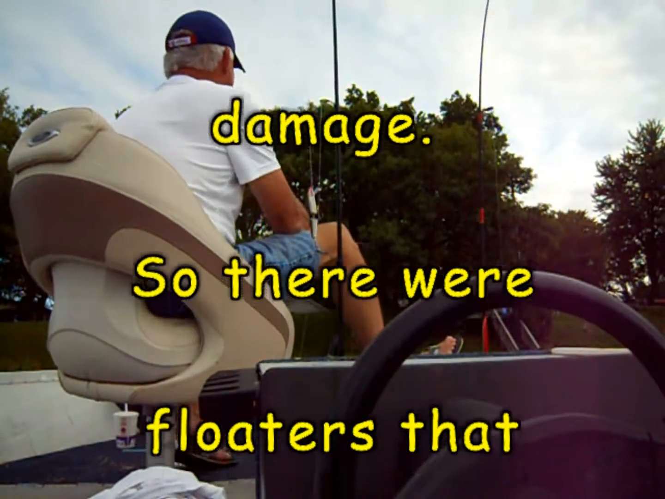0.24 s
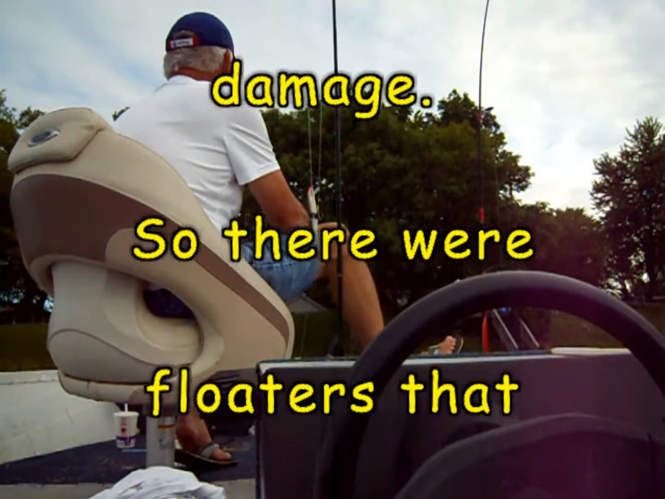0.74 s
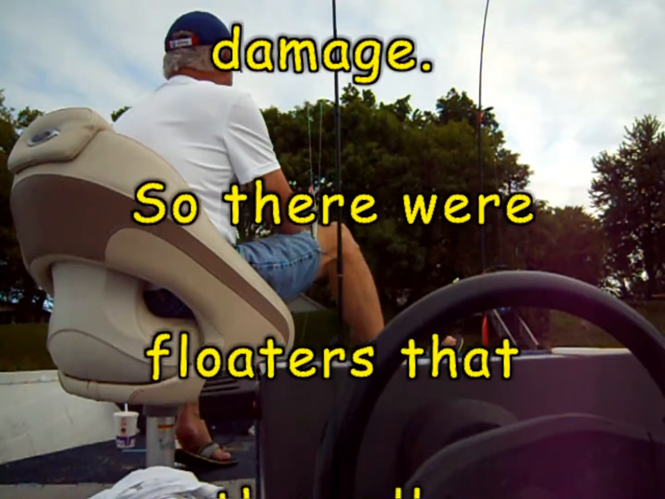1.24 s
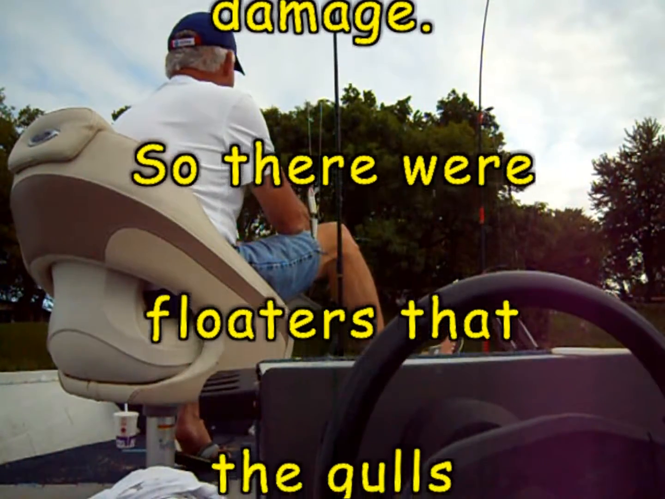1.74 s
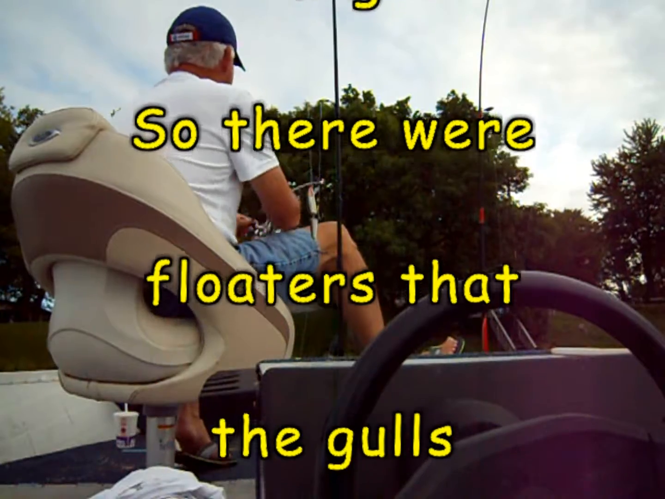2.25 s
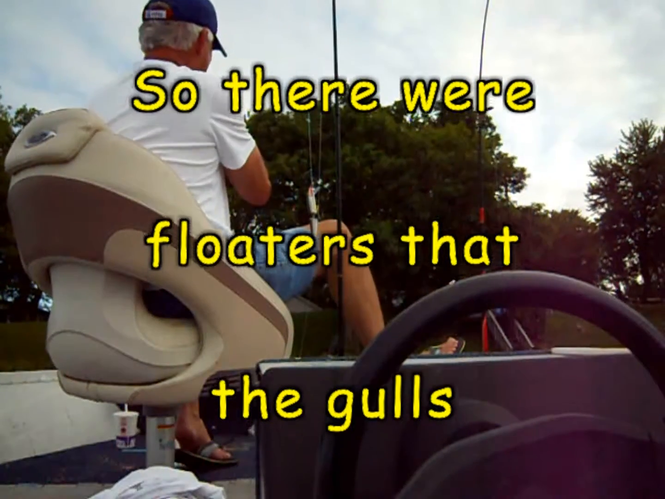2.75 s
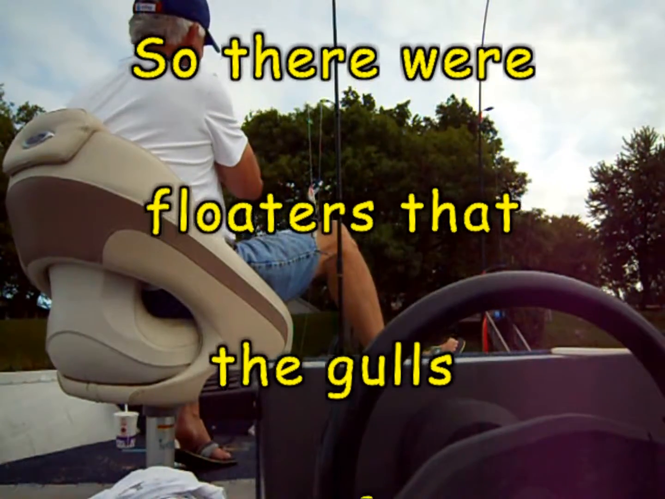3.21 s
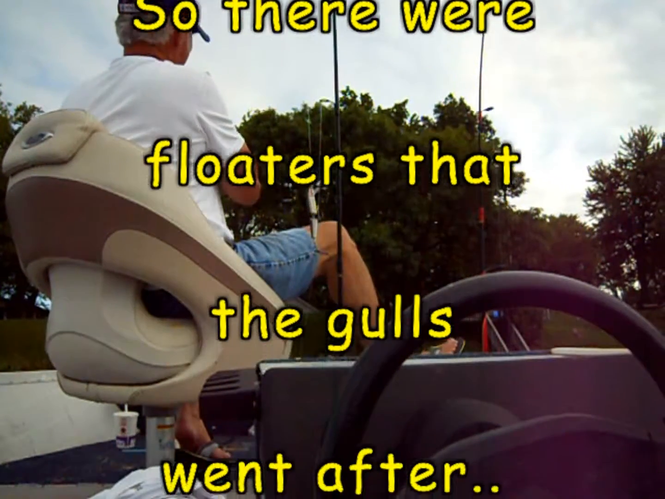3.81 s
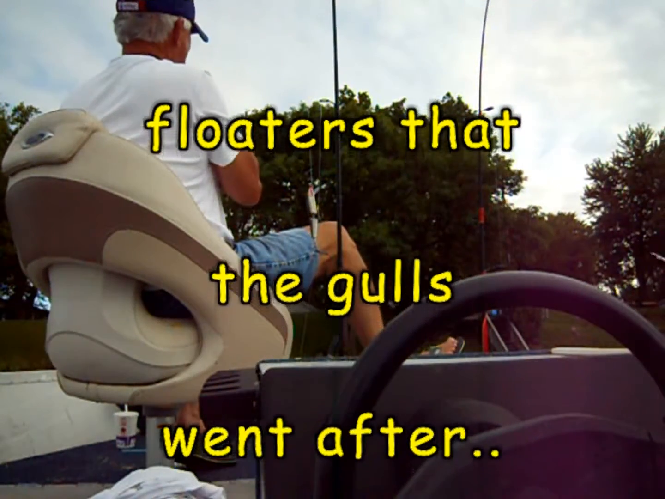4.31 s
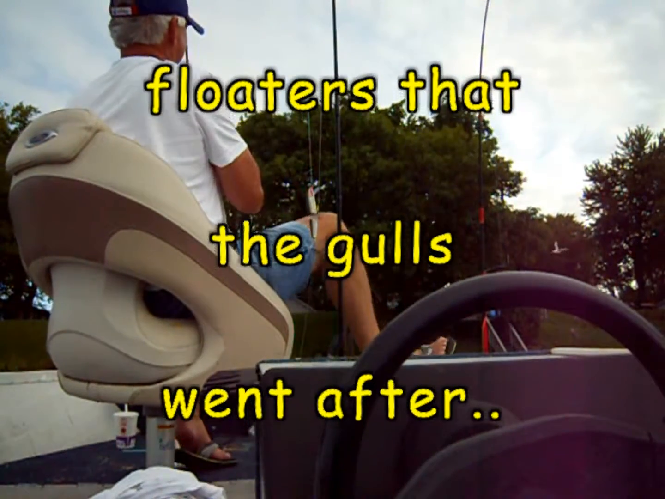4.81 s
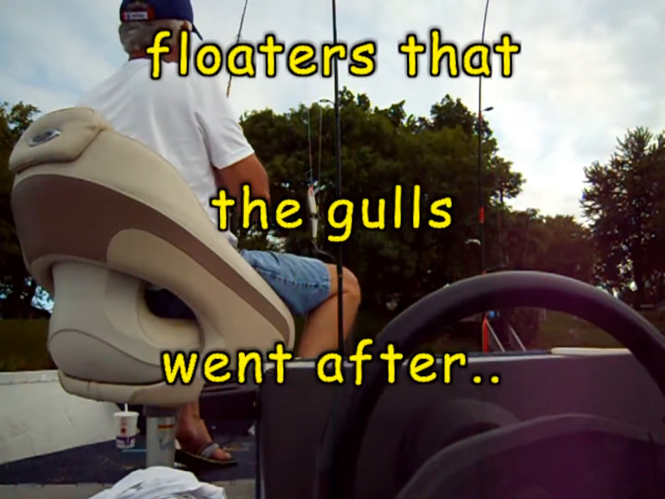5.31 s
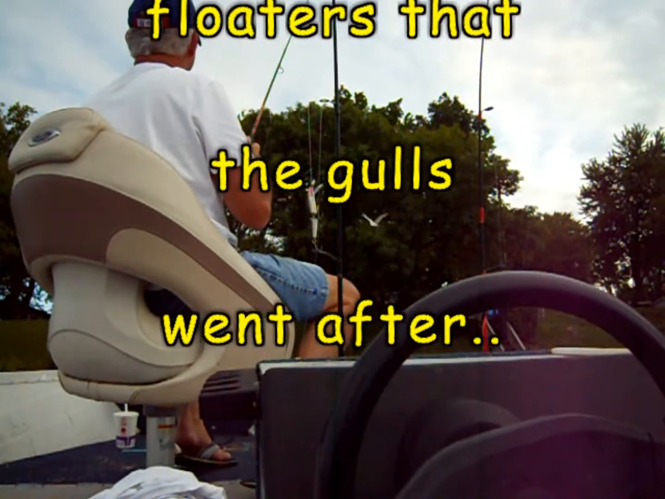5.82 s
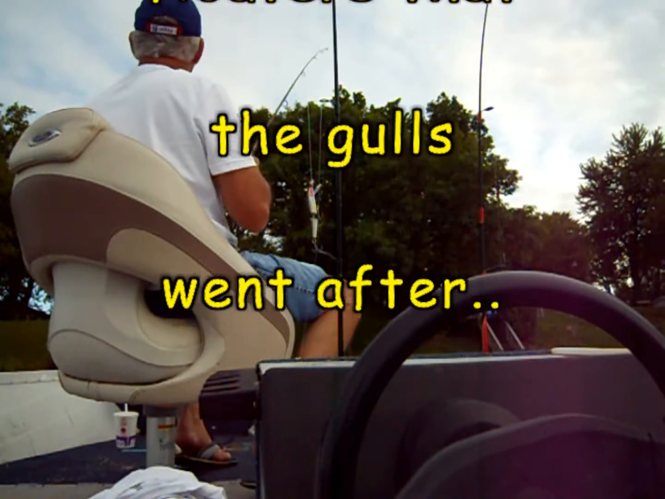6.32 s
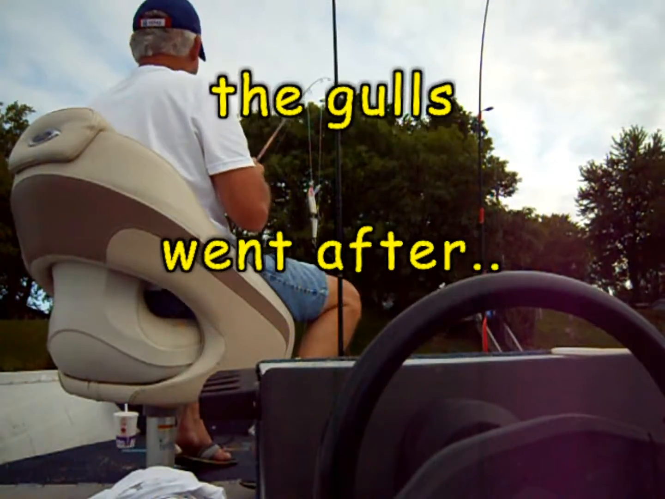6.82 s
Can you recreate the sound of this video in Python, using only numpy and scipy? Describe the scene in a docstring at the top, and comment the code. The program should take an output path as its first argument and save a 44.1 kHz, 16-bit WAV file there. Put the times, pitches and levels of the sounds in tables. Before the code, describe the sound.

Gulls call over a small fishing boat on a quiet lake. A faint, distant warble comes first, then a pause and a loud, piercing whistled trill. A weak hoarse squawk follows, with dull hull knocks. Later a strong falling squawk rings out, then another trill and a last squawk with yelps. Trees return diffuse echoes. A small cheap camera microphone gives thin, metallic treble over soft hiss and low hum.

```python
"""On a small boat on a quiet lake, gulls call: long warbled whistles near 3.6 kHz, short low yelps and
three hoarse falling squawks. Whistles are gliding sine tones; squawks are rows of harmonics shaped by a throat.
Shore trees echo them in fading noise, over a filtered-noise hiss, a low hum and small ringing knocks on the hull.
A pocket camera samples it at 16 kHz and joins the samples by straight lines, which mirrors every call in the treble."""
import sys
import numpy as np
from scipy import signal
from scipy.fft import rfft, irfft
from scipy.io import wavfile

SR = 44100
rng = np.random.default_rng(int(sys.argv[2]) if len(sys.argv) > 2 else 0)


def log_audio(samples):
    """Write samples as a 16-bit WAV file to the path given in sys.argv[1]."""
    # one column per channel
    frames = np.atleast_2d(samples).T
    # limit to full scale, then quantise
    limited = np.clip(frames, -1, 1)
    pcm = np.round(limited * 32767).astype(np.int16)
    wavfile.write(sys.argv[1], SR, pcm)


N = 311077

# Warbled whistles, a list of throbs each; one row a throb: (time of lowest pitch [s], lowest pitch [Hz],
# upward swing [Hz], level [dB], dip at the top of the swing [dB], fall louder than rise by [dB])
WARBLES = [
    [(0.585, 3715, 219.3, -35, 18, 0), (.636, 3716, 178, -30, 7, 8), (.69, 3850, 30, -30, 7, 0),
     (.745, 3690, 59.6, -34.5, 12, 6), (0.785, 3585, 157, -34, 8, 6), (0.84, 3570, 141.4, -31, 12, 0),
     (.89, 3543, 223, -30, 15, 5), (.942, 3610, 110, -30.5, 7.5, 6), (1.006, 3330, 310, -44, 1, 23)],
    [(2.059, 3790, 102, -20.5, 4.5, -1.5), (2.11, 3837, 91, -27, 51, 4), (2.148, 3894, 125, -16.5, 46, 8),
     (2.193, 3830, 149, -16, 50, 2), (2.24, 3757, 274, -6.5, 47, 0), (2.286, 3747, 327, -8, 31, 2),
     (2.33, 3560, 117, -9, 6, 15.5), (2.357, 3794, 4.4, -11, 13, -11), (2.384, 3544, 137.6, -6, 28, 3),
     (2.432, 3558, 227, -5, 36, -3), (2.485, 3562, 240, -5, 22, 0), (2.535, 3544, 190, -6.5, 11.5, 5),
     (2.585, 3555, 193, -7, 7, 6), (2.637, 3520, 86, -7.5, 8, 7.5), (2.686, 3405, 142, -8.5, 11, 3.5),
     (2.737, 3338, 310, -11, 3, 5.5), (2.786, 3325, 250, -12, 2.5, 6.5), (2.834, 3286, 57, -10, 20, -0.5)],
    [(5.957, 3760, 85, -14, 4.5, -1), (6.026, 3705, 93, -15.5, 7, -0.5), (6.073, 3650, 111, -13.5, 1.5, 1),
     (6.125, 3480, 270, -12.5, 9.5, 2.5), (6.176, 3570, 213, -14, 10, 5), (6.237, 3580, 85, -17.5, 7, 6),
     (6.289, 3637, 67, -21.5, -1.5, -3), (6.347, 3327, 290, -15, 12, 9), (6.4, 3450, 220, -17.5, 10, 10.5),
     (6.449, 3560, 88, -19.5, 5, -2)],
    [(6.57, 3240, 170, -20, 7, -4), (6.611, 3210, 372, -26, 9, 2), (6.659, 3206, 480, -25, 0, 6),
     (6.712, 3310, 60.5, -33, 30, 4)],
]
LINGER, EARLY = 0.17, 0.17  # share of a dip still heard on the next fall, and already on the rise
NOTCH_DB, NOTCH_SCALE_DB = 4.5, 10  # throbs that dip little at the top sag at the bottom instead


def warbled_whistles():
    """The pitch swings smoothly up from each low point and back; the level dips at the top of the swing."""
    return [whistle(throbs(rows)) for rows in WARBLES]


def throbs(rows):
    """Turn throbs into a path of pitch and level, a row each millisecond: (time [s], pitch [Hz], level [dB])."""
    s, low_hz, swing_hz, db, dip_db, lean_db = np.transpose(rows)
    high_hz = low_hz + swing_hz
    before, after = np.append(.05, np.diff(s)), np.append(np.diff(s), .045)
    tops = s + .53 * after
    turns = np.append(s[0] - .025, np.ravel([s, tops], "F"))
    turn_hz = np.append(high_hz[0], np.ravel([low_hz, high_hz], "F"))

    # four levels a throb: on the fall, at the bottom, on the rise, at the top
    quarters = np.ravel([s - 0.21 * before, s, s + 0.24 * after, tops], "F")
    fall_loss = LINGER * np.roll(dip_db, shift=1) - lean_db / 2
    bottom_loss = NOTCH_DB * np.clip(1.5 - dip_db / NOTCH_SCALE_DB, 0, 1)
    rise_loss = EARLY * dip_db + lean_db / 2
    levels = db - np.array([fall_loss, bottom_loss, rise_loss, dip_db])

    t = np.arange(turns[0], turns[-1], .001)
    return np.transpose([t, swing(t, turns, turn_hz), swing(t, quarters, np.ravel(levels, "F"))])


# Steady whistled notes: (start [s], length [s], pitch [Hz], pitch before the release [Hz], level [dB],
# fade over the note [dB], upward flick as it dies [share of pitch])
NOTES = [(0.218, 0.086, 3600, 3540, -33, 12, 0.02), (0.259, 0.2, 4346, 4070, -28.5, 3, 0.018),
         (0.392, .03, 3640, 3570, -41, -1, 0.035), (0.449, .115, 4120, 3860, -44, -7, 0.032),
         (1.832, 0.071, 3250, 3293, -18.5, -1.5, 0.069), (1.902, 0.13, 3973, 3892, -6, 13, 0.01),
         (2.857, 0.011, 3260, 3220, -15, -3.5, -0.007), (4.06, 0.07, 1860, 1810, -46.5, -2, .03),
         (4.195, 0.085, 1830, 1810, -42.5, 1, 0.038), (4.28, 0.087, 1830, 1880, -45, -4, -0.0095),
         (4.39, 0.1, 1915, 1890, -48.5, 4, -.02), (5.816, 0.055, 3143, 3173, -14.5, -2.5, 0.11),
         (5.877, 0.052, 3646, 3597, -7.5, -1, 0.09), (6.474, 0.033, 3740, 3700, -33, -1, -0.13)]
SCOOP = 0.024  # a note drops onto its pitch by this share


def steady_notes():
    """Whistles that drop onto a pitch, drift a little and flick as they die."""
    return [whistle(note(*row, SCOOP)) for row in NOTES]


# Tiny high chirps between throbs: (start [s], pitch [Hz], level [dB])
CHIRPS = [(2.122, 4600, -31), (2.16, 4681, -30), (2.208, 4670, -32), (2.258, 4510, -31.5)]
CHIRP_S = 0.015


def chirps():
    """Very short whistles on one pitch."""
    return [whistle(note(s, CHIRP_S, hz, hz, db, 0)) for s, hz, db in CHIRPS]


# The voice drops a register: (start [s], length [s], pitch [Hz], end pitch [Hz], level [dB], fade [dB],
# second harmonic against the tone [dB], arch of the pitch midway [Hz])
YELPS = [(1.001, 0.025, 2360, 2270, -35, 6, -19.5, 0), (1.817, 0.012, 2080, 2240, -28.5, 6, -23, 0),
         (2.869, 0.014, 2267, 2205, -12.5, 6, -20, 0), (6.497, 0.047, 2470, 2544, -18.5, 1, -8, -74),
         (6.66, 0.016, 2580, 2570, -25, 0, -25, 0), (6.709, 0.031, 2378, 2400, -16.5, 4, -11.5, -1),
         (6.721, .052, 2394, 2260, -23.5, 5, -7.5, 220)]


def yelps():
    """Short low whistles, each with its own strength of second harmonic."""
    return [yelp(*row) for row in YELPS]


def yelp(s, length, hz, end_hz, db, fade_db, second_db, arch_hz):
    """A note whose pitch arches midway."""
    at, pitch, level = np.transpose(note(s, length, hz, end_hz, db, fade_db))
    t = np.linspace(s, s + length, num=16)
    arch = arch_hz * np.sin(np.pi * (t - s) / length)
    path = np.transpose([t, np.interp(t, at, pitch) + arch, np.interp(t, at, level)])
    return whistle(path, second_db)


# Every second cycle weakens, adding lines at half and three halves of the pitch:
# (start [s], end [s], level against the whistle [dB])
HALVING = [(0.292, 0.638, -17.5), (0.65, 0.997, -10), (1.94, 2.018, -22), (2.018, 2.072, -12.5),
           (2.287, 2.297, -25), (2.338, 2.359, -24.5), (2.4, 2.421, -8), (2.6, 2.633, -34),
           (2.655, 2.678, -23.5), (2.701, 2.728, -18.5), (2.746, 2.758, -23), (5.98, 6, -21.5),
           (6.01, 6.078, -21), (6.081, 6.118, -24), (6.131, 6.168, -21.5), (6.202, 6.232, -21.5),
           (6.308, 6.338, -28.5)]
# The whistle catches for an instant: (time [s], half width, to 1/e [s], downward slip [share of pitch],
# loss of level [dB])
CATCHES = [(2.54, 0.0037, 0.0026, 6), (2.757, 0.0016, 0, 11), (2.824, .002, 0.0031, 10),
           (5.821, 0.0019, 0.081, 4.5), (5.859, 0.0014, 0.042, 14), (6.2875, .0045, 0.21, 0),
           (6.311, .002, 0.026, 10), (6.332, 0.0015, 0, 11), (6.39, .0018, 0.022, 7), (6.662, 0.006, 0, 12)]


def whistle(rows, second_db=None):
    """A near-pure tone that flutters slightly; its second harmonic wavers and half lines come and go."""
    start, t, hz, gain = trace(rows)
    _, _, _, own_db, upper_db, _ = call_colour(t[0])
    for s, width, slip, loss_db in CATCHES:
        catch = np.exp(-((t - s) / width) ** 2)
        hz = hz * (1 - slip * catch)
        gain = gain * undb(-loss_db * catch)
    phase = 2 * np.pi * np.cumsum(hz * (1 + 0.0031 * wobble(len(t), 92.0))) / SR
    second = undb((second_db or own_db) + 3.95 * wobble(len(t), 33.6))
    tone = np.sin(phase) + second * np.sin(2 * phase)

    # the half lines fade in and out over 8 ms
    half = sum(undb(db) * np.clip(np.minimum(t - a, b - t) / 0.008, 0, 1) for a, b, db in HALVING)
    half_lines = np.sin(phase / 2) + undb(upper_db) * np.sin(3 * phase / 2)
    tone += half * undb(3.5 * wobble(len(t), 35.)) * half_lines
    flutter = undb(.8 * wobble(len(t), 70.))
    return start, np.sqrt(2) * gain * flutter * tone


HARSH, ROUGH, HOARSE, HUSKY, CLEAR = .9, .65, .4, .12, .03  # shares of rasp
# Squawks rise, fall, then jump up and die away; a row a section: (start [s], end [s], pulse rate at start [Hz],
# pulse rate at end [Hz], level at start [dB], level at end [dB], swell midway [dB],
# odd harmonics against even [dB], brightness [dB per octave], rasp [share])
SQUAWKS = [(3.073, 3.101, 792, 880, -38, -36, 0.5, 12, -11, HARSH),
           (3.1, 3.136, 888, 993, -27.5, -22.5, -0.5, 8.5, -2.5, HOARSE),
           (3.139, 3.166, 901, 882, -33, -28, 7, 6, -1.5, HOARSE),
           (3.167, 3.276, 879, 799.6, -21, -26, -2.5, 0.5, -0.5, HUSKY),
           (3.266, 3.341, 957, 936, -26.5, -31, 0, -2, -2.5, HUSKY),
           (3.351, 3.419, 950, 919, -31, -34, -3, -1, -1.5, HARSH),
           (4.77, 4.807, 782, 1012, -28.5, -13, 2, 6, -0.5, HARSH),
           (4.81, 4.821, 1016, 1037, -8.5, -9, 0, -2, 0, CLEAR),
           (4.822, 4.834, 1048, 1192, -8.5, -15, -3, -12, 1.5, HUSKY),
           (4.831, 4.856, 1000, 903, -14, -15, 1, 0, 2.5, ROUGH),
           (4.858, 4.884, 907, 867, -13.5, -13, -0.5, 3, 3, HOARSE),
           (4.885, 4.954, 860, 783, -14.5, -18.5, 2, -1.5, 2.5, HUSKY),
           (4.954, 5.06, 957.5, 930, -16, -23, -0.5, -10, -1, CLEAR),
           (5.063, 5.108, 924, 903, -21.5, -25, -4.5, -11, -4.5, HUSKY),
           (5.106, 5.145, 904, 872, -28, -40, -8, 4, -6.5, ROUGH),
           (5.794, 5.81, 840, 1305, -34.5, -40, 1, 4, -4.5, HUSKY),
           (6.527, 6.561, 781, 872, -23, -15, 2, 0, 0, ROUGH),
           (6.564, 6.755, 1057, 941, -10.5, -33.5, 5, -23.5, 4, CLEAR),
           (6.745, 6.803, 945, 902.2, -26, -28.5, -2.5, -6, 2, HOARSE),
           (6.801, 6.902, 914, 856, -28, -31, -2, 1.5, 4, ROUGH),
           (6.901, 6.977, 852, 820, -32, -42, -0.5, 3, -2, HARSH)]


def squawks():
    """Hoarse calls, built from sections of gliding pulse rate and changing rasp."""
    return [squawk(section(*part), odd, tilt, rough) for *part, odd, tilt, rough in SQUAWKS]


# A second, hoarser voice under the squawks: (start [s], length [s], pulse rate [Hz], end pulse rate [Hz],
# level [dB], fade [dB], odd harmonics against even [dB], brightness [dB per octave], rasp [share])
GROWLS = [(3.273, 0.16, 774.5, 658.6, -33.5, -1.5, -5, -2.5, HOARSE),
          (3.422, 0.08, 660.5, 643, -36, -2.5, -2.5, -6.5, HUSKY),
          (4.828, 0.044, 1168, 1080, -14.5, -3.5, -32, -1, HOARSE),
          (5.055, 0.099, 690, 594, -38.5, -6.5, -2, -6, HARSH),
          (6.558, 0.054, 866, 837, -27, 1, 4, 2, HARSH), (6.753, 0.024, 850, 780, -26.5, 1, -4, -8, HARSH),
          (6.766, .21, 650, 570.4, -35, 1, -12, -10.5, ROUGH)]


def growls():
    """Extra voices made like the squawks, each a single gliding note."""
    return [squawk(note(*part), odd, tilt, rough) for *part, odd, tilt, rough in GROWLS]


# How strongly the throat passes each frequency: (frequency [Hz], level [dB])
THROAT = [(500, -18.5), (900, -28), (1300, 4), (1900, 3), (2600, -8.5), (3600, 2.5), (4300, -10),
          (5200, -15.5), (6300, -27), (7800, -62)]
PATCHY_DB = 2.5  # a fully rasping voice fades in and out unevenly by this much


def squawk(rows, odd_db, tilt_db, rough):
    """Harmonics of the pulse rate through the throat; uneven cycles smear each of them into a rasp."""
    start, t, hz, gain = trace(rows)
    phase = 2 * np.pi * np.cumsum(hz * (1 + .05 * rough * wobble(len(t), 300.))) / SR
    at_hz, at_db = np.transpose(THROAT)
    log_resonances = np.log(at_hz * call_colour(t[0])[-1])
    voice, power = 0, 0
    for k in range(1, 10):
        throat_db = np.interp(np.log(k * hz), log_resonances, at_db)
        weight = undb(throat_db + odd_db * (k % 2) + tilt_db * np.log2(k))
        smear_hz = (150 + 400 * rough) * min(1, (k + 1) / 5)
        rasp = (wobble(len(t), smear_hz) + 1j * wobble(len(t), smear_hz)) / np.sqrt(2)
        share = rough * min(1, (k + 1) / 4)  # low harmonics stay clearer
        smear = np.sqrt(1 - share ** 2) + share * rasp
        voice += weight * np.imag(smear * np.exp(1j * (k * phase + k * k)))
        power += weight ** 2 / 2
    grain = undb(2.6 * rough * np.tanh(wobble(len(t), 380.)))  # the whole voice breaks into bursts
    grain *= undb(PATCHY_DB * rough * np.tanh(wobble(len(t), 25.6)))
    return start, gain * grain * voice / np.sqrt(power)


ATTACK_S, ATTACK_DB, RELEASE_S, RELEASE_DB = 0.0062, 7.5, 0.0254, 14.5  # longest times; short notes use less


def note(s, length, hz, end_hz, db, fade_db, flick=0, scoop=0):
    """Attack, fading hold and release as rows of (time [s], pitch [Hz], level [dB])."""
    attack, release = min(ATTACK_S, length / 2.0), min(RELEASE_S, length / 2.2)
    return [(s, hz * (1 + scoop), db - ATTACK_DB),
            (s + attack, hz, db),
            (s + length - release, end_hz, db - fade_db),
            (s + length, end_hz * (1 + flick), db - fade_db - RELEASE_DB)]


DYING = 2.3  # a fading section holds, then falls away: power of the time in its loss of level
GLIDING = .9  # pitch moves faster at first: power of the time in its glide


def section(start, end, hz, end_hz, db, end_db, swell_db):
    """A glide whose level grows evenly, or holds and then dies, with a swell midway."""
    part = np.linspace(0, 1, num=16)
    bend = part ** (DYING if end_db < db else 1)
    level_db = db + (end_db - db) * bend + swell_db * np.sin(np.pi * part)
    return np.transpose([start + part * (end - start), hz + part ** GLIDING * (end_hz - hz), level_db])


def trace(rows):
    """Start sample, time, pitch and gain along a note, cross-fading over its ends."""
    edge_s = .0025
    s, hz, db = np.transpose(rows)
    start = int((s[0] - edge_s) * SR)
    t = np.arange(start, int((s[-1] + edge_s) * SR)) / SR
    to_edge = np.minimum(t - t[0], t[-1] - t)
    ends = np.sin(np.pi / 2 * np.clip(to_edge / (2 * edge_s), 0, 1))
    return start, t, np.interp(t, s, hz), undb(np.interp(t, s, db)) * ends


# How the calls sound from each time on: (from time [s], echo [dB], far trees against shore [dB],
# second harmonic of the whistle [dB], line at three halves against line at half [dB],
# stretch of the throat's resonances [factor])
CALL_COLOURS = [(0, -6.5, -7, -25, -25, 1.), (1.7, -14.5, -9, -27, -4, 1.),
                (3.0, -4, -14.5, -43, -33, 1.11), (4.7, -14.5, -22, -32, -20, 1.042),
                (5.7, -21.5, -13, -30.5, -13, 1.04), (5.929, -20, -17, -20, -13, 1.),
                (6.5, -19.5, -16, -22.5, -14, 1.003)]


def call_colour(s):
    """Echo, whistle harmonics and throat that hold at times s, as columns."""
    table = np.array(CALL_COLOURS)
    return table[np.searchsorted(table[1:, 0], s)].T


def gulls():
    """All calls together, with their echoes."""
    calls = warbled_whistles() + steady_notes() + chirps() + yelps() + squawks() + growls()
    dry = np.zeros(N)
    for start, sound in calls:
        dry[start:start + len(sound)] += sound
    return dry + echoes(dry)


SHORE_T60_S, SHORE_RISE_S = 0.57, 0.032  # time to decay by 60 dB, and time to build up
TREES_S, TREES_SPREAD_S = 0.293, .014  # delay of the far trees, and half width of their echo, to 1/e


def echoes(dry):
    """Noise-like echoes: a diffuse one from the near shore and a late, smeared one from the far tree line."""
    t = np.arange(SR) / SR
    shore = np.exp(-np.log(1000) * t / SHORE_T60_S) * np.clip(t / SHORE_RISE_S, 0, 1)
    trees = np.exp(-((t - TREES_S) / TREES_SPREAD_S) ** 2)
    leaves = rng.standard_normal(SR) / np.sqrt(np.sum(shore ** 2))
    echo_db, trees_db = call_colour(np.arange(N) / SR)[1:3]
    wet = dry * undb(echo_db)
    near = signal.fftconvolve(wet, leaves * shore)
    far = signal.fftconvolve(wet * undb(trees_db), leaves * trees)
    return (near + far)[:N]


# Knocks and slaps on the hull: (time [s], level [dB], ring [Hz])
KNOCKS = [(2.378, -39, 694), (2.468, -41.5, 368), (2.499, -39, 284), (2.724, -37.5, 346),
          (3.007, -41.5, 649), (3.385, -36, 192.5), (3.771, -41, 654), (4.119, -44.5, 580),
          (4.342, -42, 445)]


def hull():
    """Each knock is a short dull ring, a dying sine, with a splash of noise."""
    out, t = np.zeros(N + SR), np.arange(SR // 10) / SR
    for s, db, hz in KNOCKS:
        ring = np.sin(2 * np.pi * hz * t) * np.exp(-t / 0.035)
        splash = 1.52 * band(rng.standard_normal(len(t)), 230, 2500) * np.exp(-t / 0.023)
        start = int(s * SR)
        out[start:start + len(t)] += undb(db) * (ring + splash)
    return out[:N]


# Level of hiss and hum together, sinking in the second half: (time [s], level [dB])
BACKGROUND = [(0, -35.5), (3, -36), (4.75, -36), (4.85, -39), (5.7, -39.5), (6.5, -37), (6.62, -41.5),
              (7.05, -42)]


def background():
    """Hiss and hum, rising and sinking together."""
    t = np.arange(N) / SR
    return undb(np.interp(t, *np.transpose(BACKGROUND))) * (hiss() + hum())


# Shape of the hiss, only the differences count: (frequency [Hz], level [dB])
HISS = [(15, -71), (25, -8), (60, -16.5), (110, -7.5), (240, -16.5), (500, -15.5), (1000, -18),
        (2300, -20.5), (4400, -23), (8000, -23.5)]


def hiss():
    """White noise whose level wavers slightly, filtered to a soft hiss with strong bass."""
    hz = np.fft.rfftfreq(N, 1 / SR) + 1
    at_hz, at_db = np.transpose(HISS)
    white = rng.standard_normal(N) * undb(0.25 * wobble(N, 15.0))
    soft = irfft(rfft(white) * undb(np.interp(np.log(hz), np.log(at_hz), at_db)), N)
    return soft / np.std(soft)


# Tones of the hum: (frequency [Hz], level over the background [dB])
HUM = [(60, -4.5), (120, -30), (180, -18), (240, -23)]


def hum():
    """Low sine tones that waver together in pitch and separately in level."""
    turn = 2 * np.pi * np.cumsum(1 + 0.0131 * wobble(N, 6.16)) / SR
    return sum(undb(db + 3.7 * wobble(N, 32.0)) * np.sin(f * turn) for f, db in HUM)


def undb(db):
    """Gain of a level in dB."""
    return 10 ** (np.asarray(db) / 20)


def band(x, lo_hz, hi_hz):
    """Keep the sound between two frequencies and scale it to unit spread."""
    y = signal.sosfilt(signal.butter(2, [lo_hz, hi_hz], "bandpass", fs=SR, output="sos"), x)
    return y / np.std(y)


def wobble(count, rate_hz):
    """Smooth random motion of unit spread, mostly slower than rate_hz."""
    noise = rng.standard_normal(count + 4000)
    y = signal.sosfilt(signal.butter(2, rate_hz, fs=SR, output="sos"), noise)[4000:]  # skip the filter's start
    return y / np.std(y)


def swing(t, turns, values):
    """Smooth passage through the values at the turning times."""
    place = np.interp(t, turns, np.arange(len(turns)))
    k = place.astype(int)
    part = (1 - np.cos(np.pi * (place % 1))) / 2
    return values[k] + part * (values[k + 1] - values[k])


def scene():
    """Gulls, hull and background, in mono."""
    return (gulls() + hull() + background())[None]


# Peaks and dips of the camera's housing: (frequency [Hz], half width, to 1/e [Hz], level [dB])
MICROPHONE = [(5370, 470, 6), (6200, 670, -1.5), (7086, 685, 9)]
HEADROOM = 1.1  # size that rounded peaks cannot pass
SAMPLE_HZ, ALIAS_HZ, TOP_HZ = 16000, 7500, 15790  # sampling rate, low-pass before it, cut after it


def record(dry):
    """Colour, round the peaks, filter, sample coarsely, join the samples by straight lines, cut the top."""
    hz = np.fft.rfftfreq(N, 1 / SR)
    colour_db = sum(db * np.exp(-((hz - f) / w) ** 2) for f, w, db in MICROPHONE)
    coloured = irfft(rfft(dry[0]) * undb(colour_db), N)
    rounded = HEADROOM * np.tanh(coloured / HEADROOM)
    smooth = signal.sosfilt(signal.cheby1(6, .5, ALIAS_HZ, fs=SR, output="sos"), rounded)
    samples = signal.resample_poly(smooth, SAMPLE_HZ // 100, SR // 100)
    # straight lines leave mirror images above half the sampling rate
    joined = np.interp(np.arange(N) / SR, np.arange(len(samples)) / SAMPLE_HZ, samples)
    return signal.sosfilt(signal.ellip(12, .2, 80, TOP_HZ, fs=SR, output="sos"), joined)[None]


dry = scene()
out = record(dry)
log_audio(out)
```